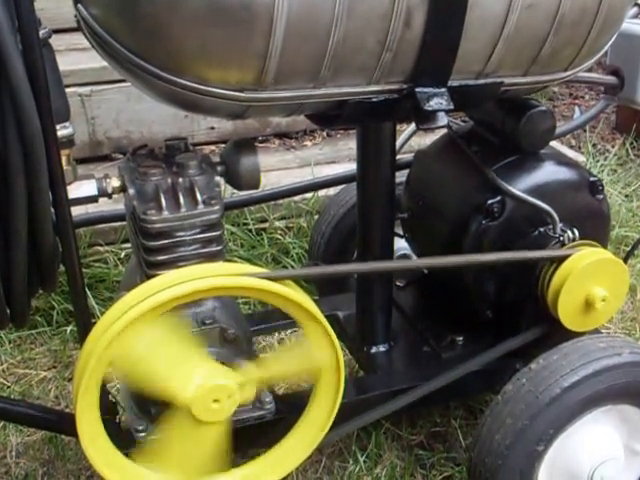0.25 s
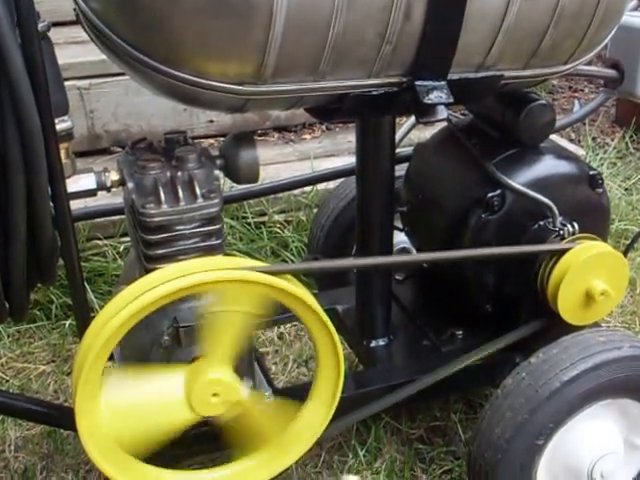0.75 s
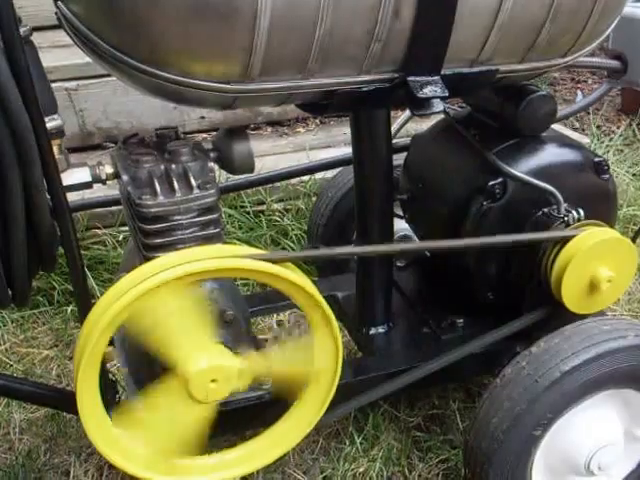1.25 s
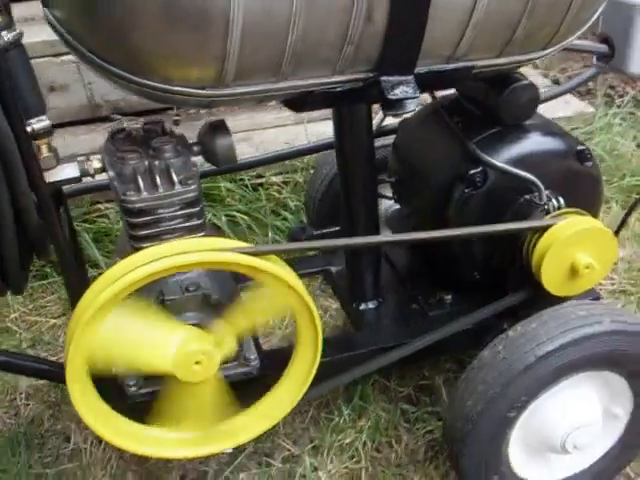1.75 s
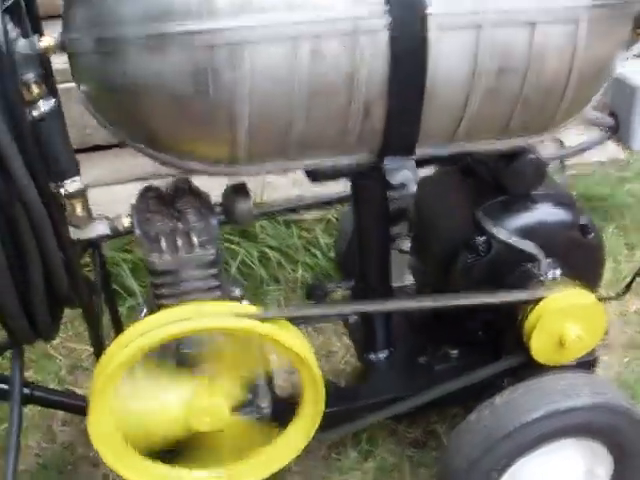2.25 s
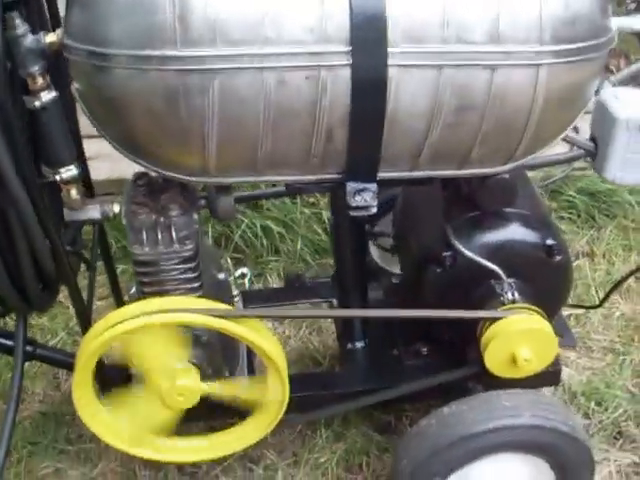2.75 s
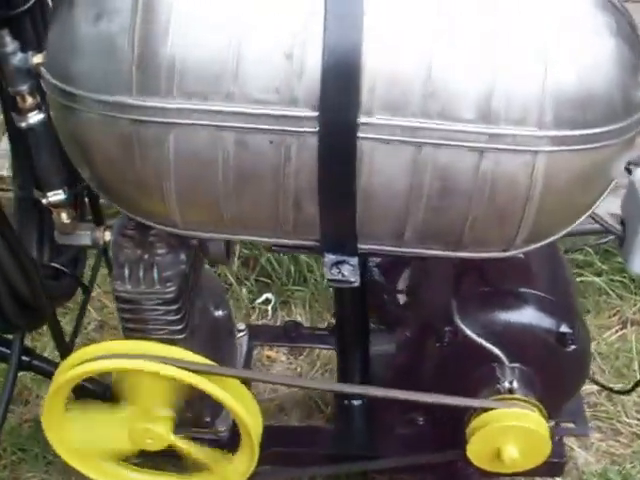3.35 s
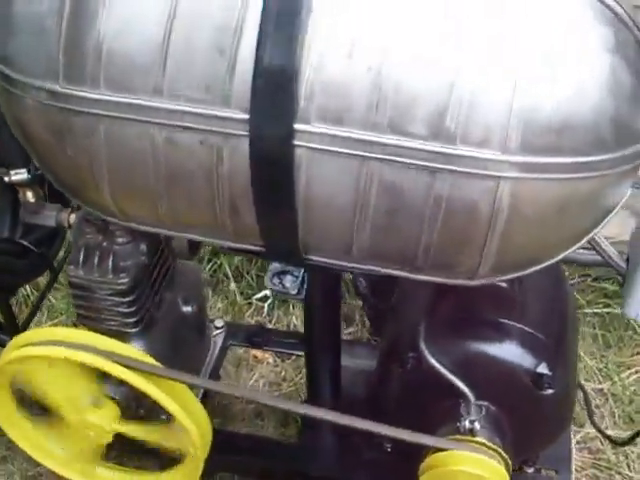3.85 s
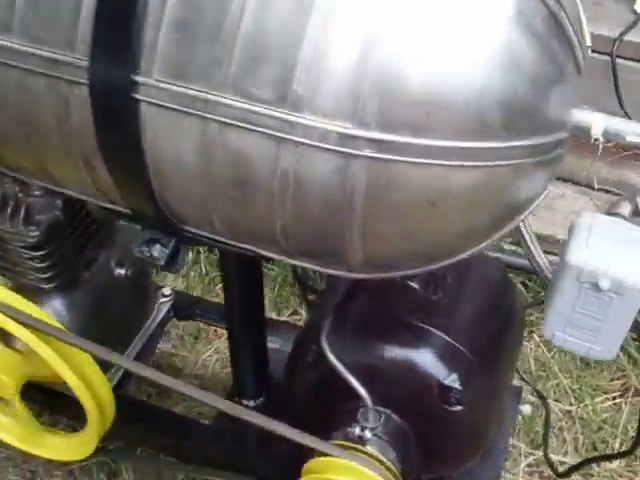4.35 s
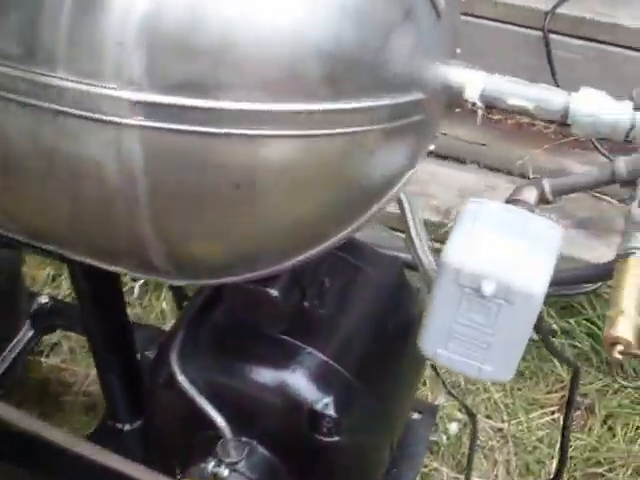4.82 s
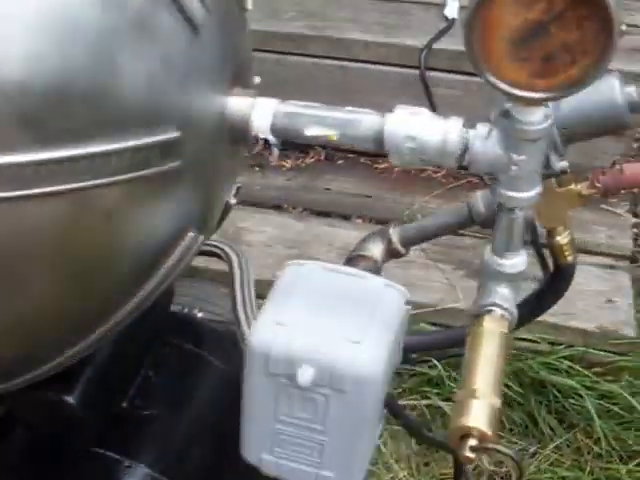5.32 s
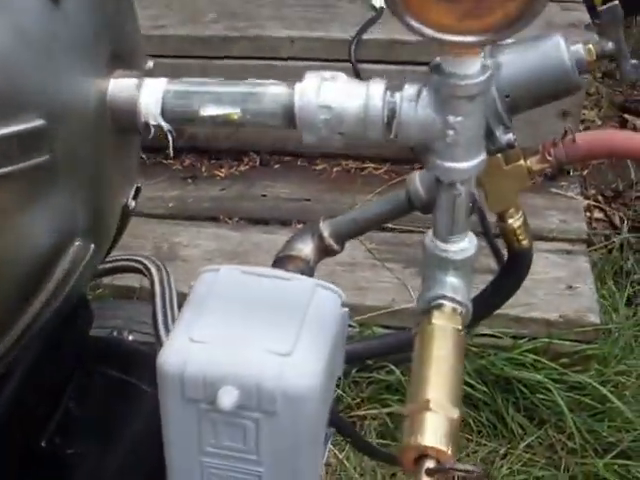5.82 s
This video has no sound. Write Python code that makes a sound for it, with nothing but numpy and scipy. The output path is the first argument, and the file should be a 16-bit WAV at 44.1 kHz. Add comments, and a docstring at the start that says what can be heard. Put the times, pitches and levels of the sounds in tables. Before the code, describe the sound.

Air jets loudly from a valve and stops suddenly after a second, revealing the rapid, regular chugging of a two-cylinder air compressor on a lawn. Its pistons knock and wheeze over a humming motor, and the slipping belt squeaks in quick runs. A few ticks and one sharp tap come from the metal parts. The close microphone travels from flywheel to tank to gauge, changing the machine's colour slightly.

```python
"""First comes a loud blast of air, cut off after a second when a valve snaps shut.
It is an old belt-driven air compressor with two cylinders, running close by on a lawn. The pump knocks
twice a turn and wheezes after each knock while the motor hums. Once the pump is under pressure, its belt
slips and squeaks on many strokes. Loose fittings tick, and something taps the casing once.
The tone shifts as the microphone moves from the flywheel past the tank to the pressure gauge."""
import sys
import numpy as np
from scipy import signal
from scipy.fft import rfft, irfft
from scipy.io import wavfile
from scipy.ndimage import uniform_filter1d

SR = 44100
rng = np.random.default_rng(int(sys.argv[2]) if len(sys.argv) > 2 else 0)


def digitize_waveform(pressure):
    """Quantize a signal to 16-bit integers and store it at the path in sys.argv[1].

    Rows of a 2-D input are taken as channels; values are limited to [-1, 1].
    """
    field = np.atleast_2d(pressure).T
    bounded = np.clip(field, -1, 1)
    quanta = np.round(bounded * 32767).astype(np.int16)
    wavfile.write(sys.argv[1], SR, quanta)


N = 268128
TIME = np.arange(N) / SR
TURN_S, FIRST_KNOCK_S, VALVE_SHUT_S = .1229, -.0108, 1.115
STROKE_S = TURN_S / 2
TURN_STARTS = np.arange(FIRST_KNOCK_S, N / SR, TURN_S)
STROKE_STARTS = np.arange(FIRST_KNOCK_S, N / SR, STROKE_S)


def from_db(db):
    """Turn decibels (dB) into a number to multiply a sound by."""
    return 10 ** (np.asarray(db) / 20)


def rms_one(x):
    """Scale a signal so its average strength (rms) is 1."""
    return x / np.sqrt(np.mean(x ** 2) + 1e-20)


# The three places: the seconds at which the microphone is by the flywheel, the tank and the gauge.
PLACE_TIMES = [1.9, 3.7, 5.0]
def by_place(levels_db):
    """Slide between three levels as the microphone passes the three places."""
    return np.interp(TIME, PLACE_TIMES, from_db(levels_db))


def coloured_noise(spectrum, peaks=()):
    """Noise shaped by (frequency in Hz, level in dB) points, with optional peaks on top."""
    hz = np.arange(N // 2 + 1) * SR / N
    points, levels = np.transpose(spectrum)
    db = np.interp(np.log(hz + 1), np.log(points), levels)
    for centre, width, lift in peaks:
        db += lift / (1 + (2 * (hz - centre) / width) ** 2)
    return rms_one(irfft(rfft(rng.standard_normal(N)) * from_db(db), N))


def filtered(x, order, hz, kind):
    """Keep the lows, the highs or a band; a higher order cuts more steeply."""
    return signal.sosfilt(signal.butter(order, hz, kind, fs=SR, output="sos"), x + 1e-18)


def clicks(times, levels_db):
    """Blows one sample long at the given times."""
    out, at = np.zeros(N), np.round(np.asarray(times) * SR).astype(int)
    inside = (at >= 0) & (at < N)
    out[at[inside]] = from_db(levels_db)[inside]
    return out


def fade_after(blows, decay_s):
    """A loudness curve that jumps at each blow and dies away."""
    return signal.lfilter([1], [1, -np.exp(-1 / (decay_s * SR))], blows + 1e-18)


def strike(force, hz, ring_s, attack_speed=0.39):
    """One ringing note of the machine; it fades by 60 dB in its ring time, ring_s."""
    step = 2 * np.pi * hz / SR
    # the blow takes a cycle or so to spread, which softens the start
    r = np.exp(-np.pi * attack_speed * hz / SR)
    feed = np.array([1, 0, -1]) * (1 - r * r) / 2
    spread = signal.lfilter(feed, [1, -2 * r * np.cos(step), r * r], force + 1e-18)
    decay = np.exp(-np.log(1000) / (ring_s * SR))
    return signal.lfilter([0, np.sin(step)], [1, -2 * decay * np.cos(step), decay ** 2], spread + 1e-18)


def stroke_swell(delay_s, depth_db):
    """A loudness curve that peaks delay_s after each knock."""
    angle = 2 * np.pi * (TIME - FIRST_KNOCK_S - delay_s) / STROKE_S
    return from_db(depth_db * (np.cos(angle) - 1) / 2)


# The tone of the air jet. Each row: frequency in Hz, level in dB.
JET_SPECTRUM = [(25, -22), (60, -12.5), (170, -13), (260, -12), (430, -10.5), (1150, -6.5), (1850, -11),
                (2800, -7.5), (5300, -4.5), (6800, 0.5), (8000, -2), (10400, -3), (11300, -8)]
# Pitches the outlet boosts. Each row: pitch in Hz, width in Hz, boost in dB.
OUTLET_PEAKS = [(2400, 38, 7), (3110, 330, 6.5), (3740, 98, 4.5), (4300, 320, 5.5), (5760, 330, 1),
                (6440, 150, 3.5), (6920, 300, 2.5)]
def blow_off(level_db=-12, closing_s=0.0048, drop_db=14, tail_db_per_s=350):
    """Swirling air jets out until the valve shuts; then the air left in the outlet dies away."""
    since_shut = np.maximum(TIME - VALVE_SHUT_S, 0)
    closed = np.minimum(since_shut / closing_s, 1)
    db = level_db - drop_db * closed - tail_db_per_s * since_shut
    return from_db(db) * coloured_noise(JET_SPECTRUM, OUTLET_PEAKS)


# The hits in one turn, three per cylinder. Each row: seconds into the turn, level in dB.
PISTON_HITS = [(0, 1.5), (0.0165, -13.5), (0.055, -13.5), (0.0623, -0.5), (0.08, -9.5), (0.1096, -8.5)]
# How much each of those hits varies by chance. Each row: spread in dB, spread in seconds.
HIT_SPREAD = [(1, .0001), (1.2, .0001), (4, .001), (1, .0001), (1.2, .0001), (4, .0007)]
# Notes of the pump, frame and tank. Each row: pitch in Hz, ring time in seconds, dB at the three places.
BODY_NOTES = [(103, 0.047, -60, -60, -65), (331, 0.39, -85, -42, -42), (376.2, 0.15, -42, -53, -33.5),
              (431, 0.022, -25.5, -23.5, -21), (492.2, 0.027, -23.5, -22, -22),
              (579, 0.035, -26.5, -23, -55), (777.6, 0.071, -37, -37.5, -40),
              (855.7, 0.043, -51, -31, -32.5), (940.2, 0.091, -49.5, -34.5, -43.5),
              (1107, 0.33, -55, -77, -88), (1210, 0.018, -41, -48, -42.5)]
def knocks(level_db=3, rebound_s=0.004577, rebound_db=-8, grind_db=-34, rattle_db=-34):
    """Pistons knock as they turn back; the bearings grind alike on every turn and rattle under load."""
    delay, hit_db = np.transpose(PISTON_HITS)
    spread_db, spread_s = np.transpose(HIT_SPREAD)
    chance = rng.standard_normal((len(TURN_STARTS), 2, len(PISTON_HITS)))
    times = (TURN_STARTS[:, None] + delay + spread_s * chance[:, 0]).ravel()
    strengths_db = (hit_db + spread_db * chance[:, 1]).ravel()
    # the loose rod lets each hit land twice, cushioned by oil
    blows = clicks(times, strengths_db) + clicks(times + rebound_s, strengths_db + rebound_db)
    blows = filtered(blows, 4, 1350, "low")
    grind_swell = from_db(grind_db) * stroke_swell(delay_s=0.00083, depth_db=6)
    rattle_swell = from_db(rattle_db) * stroke_swell(delay_s=0, depth_db=18)
    out = np.zeros(N)
    for hz, ring_s, *levels_db in BODY_NOTES:
        grind = grind_swell * np.resize(rng.standard_normal(round(TURN_S * SR)), N)
        rattle = rattle_swell * rng.standard_normal(N)
        roughness = min(hz / 700, 1.3)  # rough surfaces feed mostly the higher notes
        out += by_place(levels_db) * strike(blows + roughness * (grind + rattle), hz, ring_s)
    # so small a frame gives off little deep bass
    return from_db(level_db) * filtered(out, 2, 85, "high")


# Air passages in the cylinder head. Each row: pitch in Hz, width in Hz, dB at the three places.
AIR_PASSAGES = [(2116, 147, -41, -48.5, -40.5), (2322, 89, -35, -50, -41.5),
                (2531, 103, -40.5, -36.5, -35.5), (2820, 164, -40, -35.5, -32.5),
                (3049, 114, -31.5, -47, -38.5), (3253, 84, -36.5, -40, -34.5),
                (3564, 290, -36, -37.5, -39.5), (4240, 340, -39.5, -37.5, -39)]
def wheeze(level_db=-3):
    """After each knock, air is pushed through the passages: it swells quickly, then dies away."""
    out = np.zeros(N)
    for hz, width, *levels_db in AIR_PASSAGES:
        breath = filtered(rng.standard_normal(N), 2, [hz - width / 2, hz + width / 2], "band")
        out += by_place(levels_db) * rms_one(breath)
    since_knock = (TIME - FIRST_KNOCK_S) % STROKE_S
    flow_db = np.interp(since_knock, [0, .004, .011, .022, .034, .046, STROKE_S],
                        [-7.5, -12.5, -8.5, -1, -10, -14, -21.5])
    return from_db(level_db + flow_db) * out


# The tone of the valve hiss. Each row: frequency in Hz, level in dB.
HISS_SPECTRUM = [(35, -6), (110, 6), (1000, 7.5), (1400, -10.5), (1800, -6), (2300, 6), (3500, -8),
                 (5200, 6), (6500, -1), (7800, 0), (9200, -6), (11000, -1.5)]
# How loud it is over time. Each row: time in seconds, level in dB.
HISS_LEVELS = [(0, -40), (1.9, -44), (2.4, -36), (3.5, -38.5), (4.6, -37.5), (6.08, -35.5)]
def valve_hiss(spit_db=-8, uneven_db=2):
    """Air hisses through the pump's valves, with a short bright spit as each one closes."""
    hiss = coloured_noise(HISS_SPECTRUM) * stroke_swell(delay_s=0.022, depth_db=5.5)
    bright = coloured_noise([(2000, -33), (4500, -26), (5500, -9), (8500, 0), (11000, 0)])
    strokes = np.arange(0, N / SR, STROKE_S)
    chance_db = np.interp(TIME, strokes, uneven_db * rng.standard_normal(len(strokes)))
    spit = from_db(spit_db + chance_db) * bright * stroke_swell(delay_s=0.051, depth_db=117)
    return from_db(np.interp(TIME, *np.transpose(HISS_LEVELS))) * (hiss + spit)


# The tones of the hum. Each row: multiple of the motor's speed, dB at the three places.
HUM_TONES = [(6, -45, -54, -46.5), (8, -66, -59, -47.5), (15, -61, -41.5, -40.5), (18, -54, -74, -50.5)]
def motor(speed_hz=58.0, waver_hz=0.1275):
    """The motor hums, wavering a little and throbbing with the load of each stroke."""
    speed = speed_hz + waver_hz * coloured_noise([(1, 0.5), (6, 0), (25, -31), (200, -90)])
    angle = 2 * np.pi * np.cumsum(speed) / SR
    hum = sum(by_place(db) * np.sqrt(2) * np.sin(multiple * angle) for multiple, *db in HUM_TONES)
    return hum * stroke_swell(delay_s=0.0012, depth_db=5)


# The tone of the outdoor background. Each row: frequency in Hz, level in dB.
OUTDOOR_SPECTRUM = [(20, -24), (50, -25), (85, 24), (170, 7.5), (250, -27), (600, -20), (1500, 5.5),
                    (8000, -30)]
def open_air(level_db=-57):
    """The open air adds a faint, steady noise."""
    return from_db(level_db) * coloured_noise(OUTDOOR_SPECTRUM)


# Notes of the air intake. Each row: pitch in Hz, ring time in seconds, dB at the three places.
INTAKE_NOTES = [(140.6, 0.055, -46, -45.5, -37), (170.6, 0.079, -29.5, -33, -31)]
def intake(lead_s=0.0011, uneven_db=0.32):
    """Each cylinder gulps air once a turn: a soft, low throb."""
    gulps = clicks(STROKE_STARTS - lead_s, uneven_db * rng.standard_normal(len(STROKE_STARTS)))
    return sum(by_place(db) * strike(gulps, hz, ring_s, attack_speed=0.67)
               for hz, ring_s, *db in INTAKE_NOTES)


# Notes of the flywheel. Each row: pitch in Hz, ring time in seconds, dB at the three places.
FLYWHEEL_NOTES = [(817.6, 0.17, -78, -27.5, -32.5), (896.5, 0.17, -55, -31, -31),
                  (953.6, 0.15, -35.5, -29, -38)]
def flywheel(lead_s=0.006876, uneven_db=1.7):
    """Just before the first knock of each turn, the belt's pull sets the flywheel ringing."""
    blows = clicks(TURN_STARTS - lead_s, uneven_db * rng.standard_normal(len(TURN_STARTS)))
    return sum(by_place(db) * strike(blows, hz, ring_s, attack_speed=0.16)
               for hz, ring_s, *db in FLYWHEEL_NOTES)


# Grippy patches on the belt. Each row: position and half-width in belt turns,
# dB taken off a squeak when the valve shuts, change of that in dB per second.
GRIPPY_PATCHES = [(.072, .046, 32, 5), (.637, .138, 2.6, 8.2), (.978, .11, 10.5, -2.2)]
def grip_db(when, belt_turn_s=.10779):
    """How much the part of the belt now on the pulley chokes a squeak."""
    loss = 0
    for position, width, loss_db, db_per_s in GRIPPY_PATCHES:
        distance = (when / belt_turn_s - position + .5) % 1 - .5
        depth_db = np.maximum(loss_db + db_per_s * (when - VALVE_SHUT_S), 0)
        loss += depth_db * np.exp(-np.abs(distance / width) ** 3)
    return loss


# How loudly the smooth parts of the belt squeak. Each row: time in seconds, level in dB.
SLIP_LEVELS = [(1.12, -30.5), (1.36, -21), (1.9, -26), (2.4, -24), (3.1, -21), (4.3, -21.5), (4.9, -25),
               (6.08, -24)]
# How a squeak's pitch slides as the tank fills. Each row: time in seconds, slide in Hz per second.
PITCH_GLIDES = [(1.12, 12000), (5.0, -14000)]
def belt_slips(after_knock_s=.0393, pitch_hz=5782, hold_s=.0115):
    """The belt slips once a stroke. It circles out of step with the pump, so squeaks come in runs."""
    times = STROKE_STARTS + after_knock_s
    times = times[times > VALVE_SHUT_S]
    # chance makes each slip a little different
    late, loud, sharp, long, steep = rng.standard_normal((len(times), 5)).T
    db = np.interp(times, *np.transpose(SLIP_LEVELS)) - grip_db(times) + .8 * loud
    hold = hold_s * np.exp(.22 * long)
    glide = np.interp(times, *np.transpose(PITCH_GLIDES)) + 18000 * steep
    return np.transpose([times + .0008 * late, db, pitch_hz + 120 * sharp, hold, glide])


def chirps(slips, lead_s=0.0083, length_s=0.0024, low_hz=7200, high_hz=10500, rise_hz_per_s=120000):
    """As the load builds ahead of each slip, the creeping belt gives a tiny rising chirp."""
    out = np.zeros(N)
    chances = rng.random((len(slips), 2))
    levels_db = 7.5 * rng.standard_normal(len(slips))
    for when, (early, high), db in zip(slips[:, 0], chances, levels_db):
        at = int((when - lead_s * (.5 + early)) * SR) + np.arange(SR // 100)
        at = at[at < N]
        t = np.arange(len(at)) / SR
        pitch = low_hz + (high_hz - low_hz) * high + rise_hz_per_s * t
        swell = 2 * t / length_s * np.exp(1 - 2 * t / length_s)
        out[at] += from_db(db) * swell * np.sin(2 * np.pi * np.cumsum(pitch) / SR)
    return by_place([-54, -39.5, -44.5]) * out


# A squeak's overtone, an octave up: its dB compared with the main tone at the three places.
OVERTONE_DB = [-21, -16, -10.5]
def squeaks(slips, level_db=1.5, rise_s=.0075, fall_s=.004, catch_s=.0006,
            sag_hz=800, grip_hz_per_db=20.5, edge_db=-13, flutter_db=1.54):
    """The slipping belt sings: the pitch climbs, locks for a moment and drops as the belt grips again."""
    out, overtone = np.zeros(N), by_place(OVERTONE_DB)
    waver, rasp, flutter = (rms_one(uniform_filter1d(rng.standard_normal(N), size))
                            for size in (50, 50, 130))
    for when, db, hz, hold, glide in slips:
        at = np.arange(int((when - .025) * SR), min(int((when + .025) * SR), N))
        t = at / SR - when
        from_middle = np.abs(t) / (hold / 2 + np.where(t < 0, rise_s, fall_s))
        # full and clean while the pitch is locked, thin and unsteady at the edges
        caught = .5 + .5 * np.tanh((t + hold / 2) / catch_s)
        locked = caught * np.exp(-(2 * np.maximum(t, 0) / hold) ** 3)
        edges = from_db(edge_db) * np.exp(-(from_middle / 1.05) ** 4)
        unsteady = .7 + 2 * (1 - locked)
        # a grippy patch pulls the pitch down
        centre = hz + glide * t - grip_hz_per_db * np.minimum(grip_db(at / SR), 25)
        pitch = centre - sag_hz * np.minimum(from_middle ** 3, 2) + 60 * unsteady * waver[at]
        phase = 2 * np.pi * np.cumsum(pitch) / SR
        tone = (locked + edges) * np.sin(phase)
        tone += overtone[at] * (locked + 3 * edges) * np.sin(2 * phase)
        out[at] += from_db(db + level_db + unsteady * rasp[at] + flutter_db * flutter[at]) * tone
    return out


def echoes(x, echo_db=-14, ring_s=0.13):
    """The tank, the frame and wooden steps throw back a short blur of echoes."""
    t = np.arange(SR // 8) / SR
    tail = rng.standard_normal(len(t)) * from_db(-60 * t / ring_s) * (t > .002)
    return x + from_db(echo_db) * signal.fftconvolve(x, tail / np.linalg.norm(tail))[:N]


def regrip(slips, lag_s=0.0024, uneven_db=4):
    """After each slip, even a choked one, the belt catches in its groove with a small bright tick."""
    times, db, _, hold, _ = np.transpose(slips)
    tick_db = 0.37 * (db - np.median(db)) + uneven_db * rng.standard_normal(len(times))
    fading = fade_after(clicks(times + hold / 2 + lag_s, tick_db), decay_s=0.0032)
    bright = coloured_noise([(1500, -25), (4000, -5), (7500, 2), (10500, -1)])
    return by_place([-41, -39, -30]) * fading * bright


# Ticks of the loose fittings. Each row: start in seconds, level in dB.
FITTING_TICKS = [(1.5373, -18.5), (1.5395, -36), (1.545, -26), (1.5477, -22), (1.553, -27), (1.5525, -29),
                 (2.6891, -20.5)]
def loose_fittings():
    """Loose fittings tick, each time a tiny burst of gritty noise."""
    grit = coloured_noise([(300, -7), (1500, -3), (3000, -3), (7500, -0.5), (11000, -8)])
    return grit * fade_after(clicks(*np.transpose(FITTING_TICKS)), decay_s=0.0014)


# Two blows so close that they sound like one tap. Each row: start in seconds, level in dB.
TAP_BLOWS = [(2.6878, 1.5), (2.6916, -14)]
# Notes of the casing. Each row: pitch in Hz, level in dB, ring time in seconds.
CASING_NOTES = [(950, -18.5, 0.016), (1860, -10, 0.0052), (2400, -10, 0.0036), (3770, -15, 0.0038)]
def casing_tap(level_db=4):
    """One sharp tap makes the casing ring very briefly."""
    blows = from_db(level_db) * clicks(*np.transpose(TAP_BLOWS))
    return sum(from_db(db) * strike(blows, hz, ring_s) for hz, db, ring_s in CASING_NOTES)


def scene():
    """Everything reaches one microphone, the same in both channels."""
    machine = knocks() + flywheel() + motor()
    breathing = intake() + wheeze() + valve_hiss()
    slips = belt_slips()
    belt = echoes(squeaks(slips) + chirps(slips)) + regrip(slips)
    mono = blow_off() + machine + breathing + belt + loose_fittings() + casing_tap() + open_air()
    return np.array([mono, mono])


def record(dry, low_cut_hz=45, high_cut_hz=11850):
    """A small microphone thins the bass and sharply cuts the highest treble."""
    thin = filtered(dry, 1, low_cut_hz, "high")
    return signal.sosfilt(signal.cheby2(18, 70, high_cut_hz, fs=SR, output="sos"), thin)


dry = scene()
out = record(dry)
digitize_waveform(out)
```